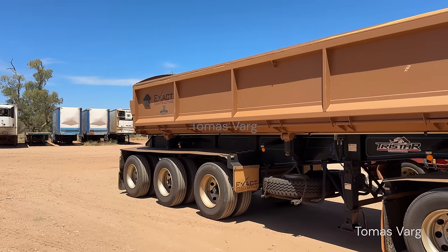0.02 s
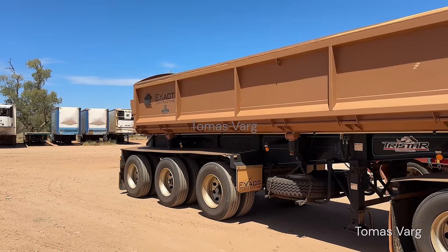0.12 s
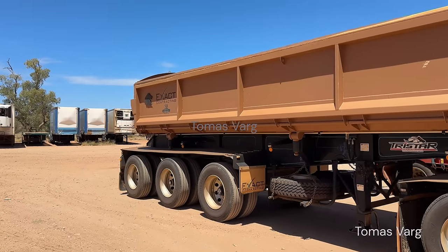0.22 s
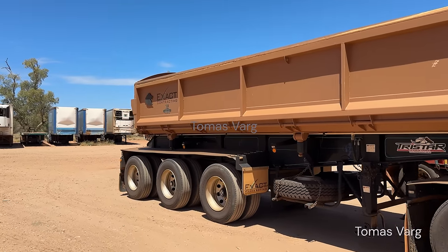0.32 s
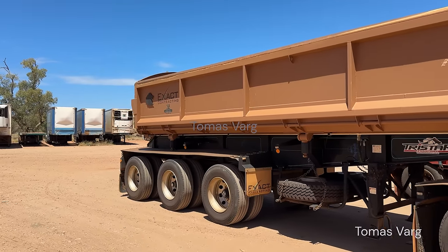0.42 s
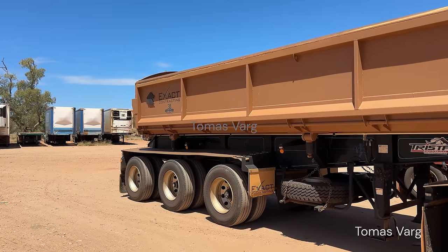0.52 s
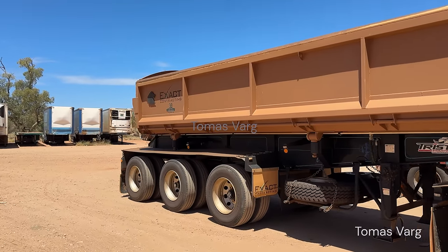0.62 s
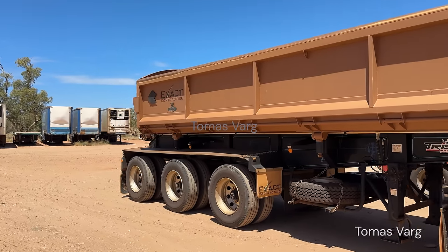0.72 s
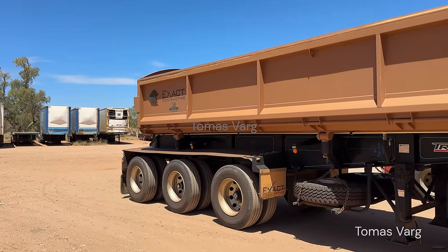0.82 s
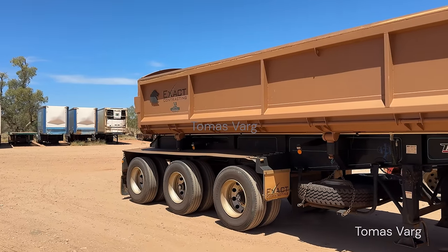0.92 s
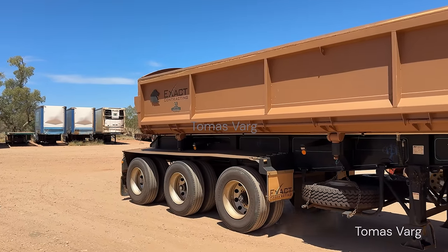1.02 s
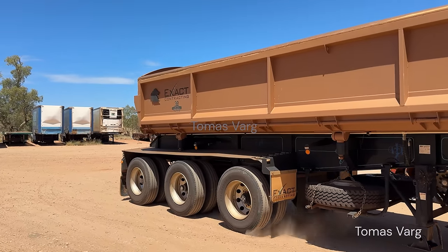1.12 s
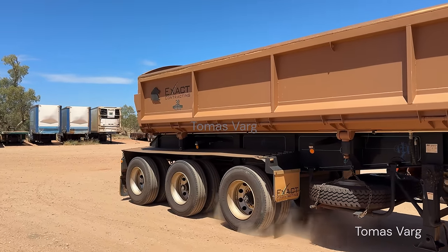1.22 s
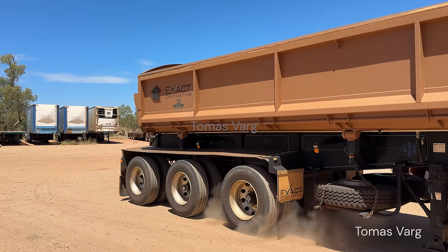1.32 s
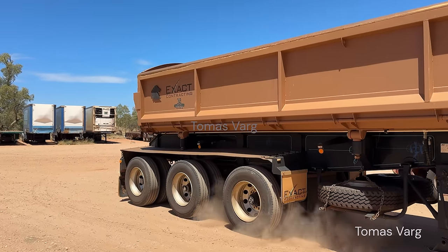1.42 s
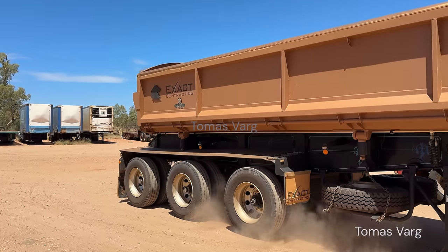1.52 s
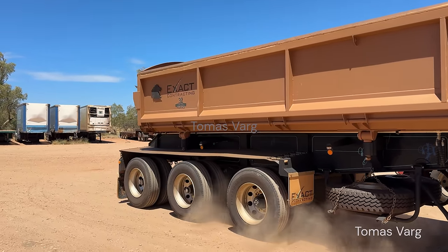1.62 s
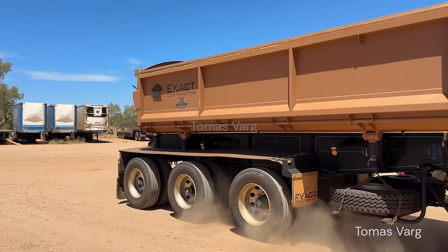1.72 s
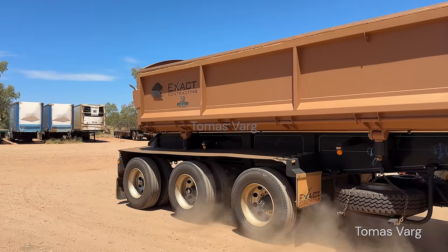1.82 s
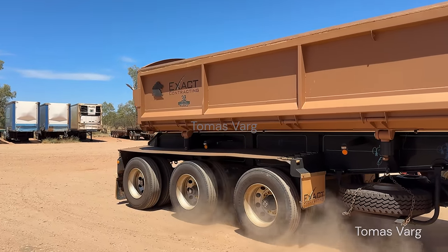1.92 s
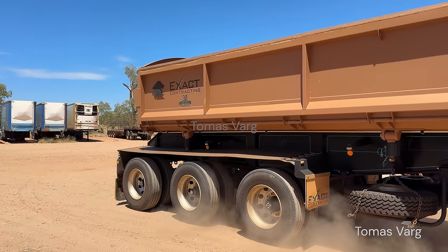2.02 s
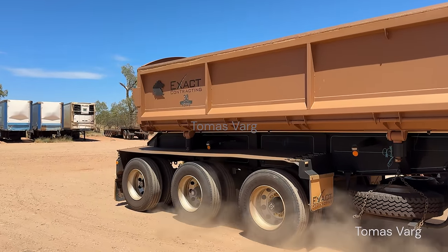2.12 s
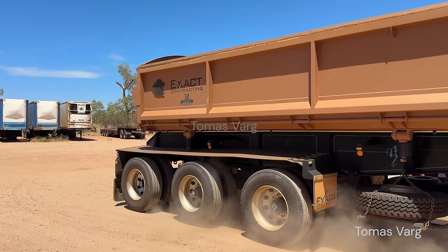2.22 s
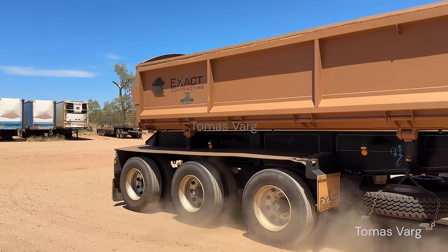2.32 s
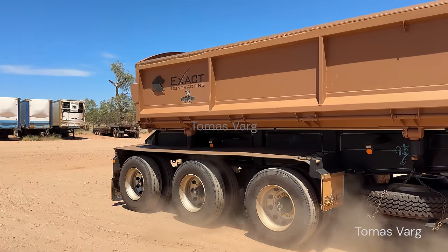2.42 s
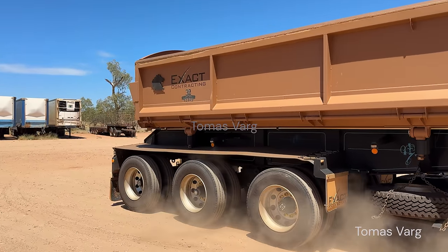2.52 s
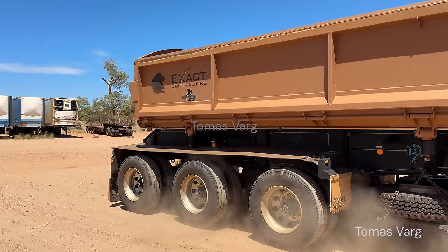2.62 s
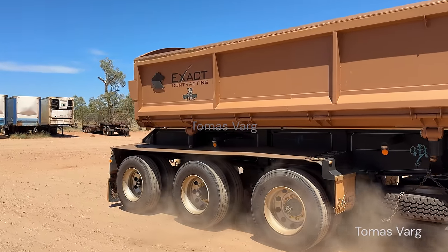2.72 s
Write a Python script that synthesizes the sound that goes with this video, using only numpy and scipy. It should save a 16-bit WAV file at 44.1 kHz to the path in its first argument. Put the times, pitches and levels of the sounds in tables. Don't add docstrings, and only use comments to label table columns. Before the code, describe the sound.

Air brakes of a heavy truck trailer release: faint dull hisses and a low knock, then a sudden loud bright blast that slowly weakens and shuts off, over faint diesel idle in an open yard, stereo.

```python
import sys
import numpy as np
from scipy import signal
from scipy.fft import rfft, irfft, next_fast_len
from scipy.io import wavfile

SR = 44100
rng = np.random.default_rng(int(sys.argv[2]) if len(sys.argv) > 2 else 0)


def gain_from_db(level_db):
    decades = np.asarray(level_db, float) / 20
    return 10 ** decades


def pcm_store(signal):
    levels = np.round(np.clip(np.atleast_2d(signal), -1, 1) * 32767)
    wavfile.write(sys.argv[1], SR, levels.astype(np.int16).T)


N = 121275

# (frequency [Hz], density [dB/Hz])
LEAK_JET_DB = [(150, -5.5), (400, -10.5), (900, -2), (1900, -0.5), (2500, -6), (5800, -5), (8500, -14),
               (16000, -34)]
# (frequency [Hz], density [dB/Hz])
FIRST_JET_DB = [(100, -13), (700, -10.5), (1900, -2), (2700, -8), (3900, -3), (6500, -4.5), (8500, -14),
                (16000, -29)]
# (frequency [Hz], density [dB/Hz])
FAR_JET_DB = [(100, -7), (700, -13.5), (1900, -3.5), (2500, -7), (3800, -5), (6500, -4), (8500, -17),
              (16000, -24.5)]
# (frequency [Hz], density [dB/Hz])
UNDER_JET_DB = [(60, -27), (150, -11), (500, -19), (1300, 0), (2100, -8), (3600, -10), (7500, -10),
                (16000, -19)]
# (frequency [Hz], density [dB/Hz])
BODY_JET_DB = [(60, -15.5), (112, 1), (160, -9.5), (225, -2), (290, -11.5), (600, -3), (1300, -11.5),
               (4000, -32.5)]
# (frequency [Hz], density [dB/Hz])
MIDDLE_JET_DB = [(60, -24), (300, -4), (1000, -11.5), (1800, -1.5), (2800, -4), (4500, -2.5), (7000, -10.5),
                 (16000, -13)]
# (frequency [Hz], density [dB/Hz])
NEAR_JET_DB = [(200, -19.5), (1050, -2), (1750, -8.5), (2800, -6.5), (7200, -4), (8500, 0.5), (11000, -0.5),
               (16000, -3.5)]

# (opens [s], shuts [s], level [dB], sag [dB/s], left lag [ms])
LEAK_VALVES = [
    (-0.12, 0.23, -37.5, 4.5, .27),
]
# (opens [s], shuts [s], level [dB], sag [dB/s], left lag [ms])
FIRST_VALVES = [
    (.162, .69, -29, 9.7, .29),
]
# (opens [s], shuts [s], level [dB], sag [dB/s], left lag [ms])
FAR_VALVES = [
    (.467, .686, -22.5, 3.5, .3),
]
# (opens [s], shuts [s], level [dB], sag [dB/s], left lag [ms])
UNDER_VALVES = [
    (.69, 2.2, -16.5, 8.65, 0.308),
]
# (opens [s], shuts [s], level [dB], sag [dB/s], left lag [ms])
BODY_VALVES = [
    (.69, 2.552, -28.5, 6.6, 0.28),
]
# (opens [s], shuts [s], level [dB], sag [dB/s], left lag [ms])
REAR_VALVES = [
    (.689, 1.215, -22.5, 3, 0.29),
]
# (opens [s], shuts [s], level [dB], sag [dB/s], left lag [ms])
MIDDLE_VALVES = [
    (.858, 1.22, -19, 16, 0),
]
# (opens [s], shuts [s], level [dB], sag [dB/s], left lag [ms])
NEAR_VALVES = [
    (.6872, 2.497, -15, 4.81, 0),
]

# (frequency [Hz], power share [0-1])
FAR_DIRECT = [(100, 0.79), (500, 0.46), (1100, .3), (2200, .8), (4500, 0.48), (7000, 0.5), (8500, .3)]
# (frequency [Hz], power share [0-1])
UNDER_DIRECT = [(100, .98), (500, 0.9), (1750, 1), (2400, 0.41), (4300, 0.66), (6300, 0.24), (7800, 0.98)]
# (frequency [Hz], power share [0-1])
NEAR_DIRECT = [(100, 0.92), (500, 1), (1200, 0.36), (2000, .4), (4200, 0.32), (6800, 0.34), (7800, 0.73)]

# (frequency [Hz], width [Hz], boost [dB])
WHISTLES = [(800, 30, 3), (1115, 110, 3), (2773, 190, 3), (3608, 67, 4.5), (4410, 410, 2.5), (8390, 720, 0)]
# (frequency [Hz], level [dB])
LEFT_TILT_DB = [(100, 1), (900, -1), (2300, -1), (3700, 4), (7000, 2.5), (8300, 0.5), (9200, 0.5)]
# (frequency [Hz], T60 [s])
YARD_T60_S = [(200, 0.4), (1000, 0.4), (4000, 0.31), (12000, 0.067)]
# (time [s], peak [dB], pitch [Hz])
KNOCKS = [
    (0.4746, -14, 78.7),
    (0.507, -19.5, 100),
    (.692, -20, 69.4),
    (0.843, -21, 112),
]
# (time [s], level [dB])
IDLE_DB = [(0, -38.5), (.08, -32.5), (.6, -31), (.75, -38.5), (1.1, -40), (1.6, -50.5), (2.2, -47),
           (2.75, -43)]
# (multiple of crank speed [-], level [dB])
ENGINE_ORDERS = [(4, -20), (5, -16), (6, 0), (8, -10), (10, -13), (12, -13)]
# (frequency [Hz], density [dB/Hz])
RUMBLE_JET_DB = [(40, -6.5), (65, -3), (120, -5.5), (250, -18), (1500, -37), (6000, -45), (10000, -59.5),
                 (16000, -86.5)]

CRANK_HZ, WOBBLE_HZ, THROB_DB, RUMBLE_DB = 10.05, 0.11, 1.8, -8
KNOCK_T60_S = 0.074
SPURT_DB, SPURT_S = 2, 0.022
SAG_GROWTH_DB_PER_S2, SHUT_DB_PER_S = 1, 517.5
FAR_OPEN_S, NEAR_OPEN_S = 0.012, 0.0007
YARD_DB, YARD_GAP_S, YARD_ALIKE = -12, 0.015, 0.81
PORT_TURN_HZ, JOINT_HZ = 7500, 8900
JOINT_LAG_MS, JOINT_IN_STEP_HZ = 0.35, 11047
LOW_CUT_HZ, TOP_CUT_HZ = 51, 15780
DRIFT_STEP = 40

SIZE = next_fast_len(N + SR)
HZ = np.maximum(np.arange(SIZE // 2 + 1) * SR / SIZE, 1)
TIME = np.arange(N) / SR


def at_hz(points, hz):
    table_hz, value = np.transpose(points)
    return np.interp(np.log(hz), np.log(table_hz), value)


def rms_one(x):
    return x / np.sqrt(np.mean(x ** 2) + 1e-20)


def drift(rate_hz, count):
    pole = np.exp(-2 * np.pi * rate_hz * DRIFT_STEP / SR)
    noise = rng.standard_normal((count, N // DRIFT_STEP + 2002))
    slow = signal.lfilter([1], [1, -2 * pole, pole ** 2], noise)[:, 2000:]
    place = np.arange(N) / DRIFT_STEP
    return np.array([np.interp(place, np.arange(len(row)), rms_one(row)) for row in slow])


def bands(x, count):
    spectrum = rfft(x, SIZE)
    place = np.clip(np.log(HZ / 150) / np.log(100) * (count - 1), 0, count - 1)
    for k in range(count):
        weight = np.clip(1 - abs(place - k), 0, 1)
        yield 150 * 100 ** (k / (count - 1)), irfft(spectrum * weight, SIZE)[:, :x.shape[1]]


def treble_lag():
    return np.exp(-2j * np.pi * (HZ - JOINT_IN_STEP_HZ) * JOINT_LAG_MS / 1000)


def at_ports(colour_db, direct, lag_ms):
    common, left, right = rfft(rng.standard_normal((3, SIZE)))
    share = np.clip(at_hz(direct, HZ), 0, 1)
    plain_lag = np.exp(-2j * np.pi * HZ * lag_ms / 1000)
    late = np.where(HZ < PORT_TURN_HZ, plain_lag, treble_lag())
    direct_part = np.sqrt(share) * np.array([common * late, common])
    scattered_part = np.sqrt(1 - share) * np.array([left, right])
    return rms_one(irfft((direct_part + scattered_part) * gain_from_db(colour_db), SIZE)[:, :N])


def diesel():
    crank_rad = 2 * np.pi * np.cumsum(CRANK_HZ + WOBBLE_HZ * drift(2.6, count=1)[0]) / SR
    throb = drift(9.5, count=len(ENGINE_ORDERS))
    start_rad = rng.uniform(0, 2 * np.pi, len(ENGINE_ORDERS))
    tones = np.zeros(N)
    for k, (order, db) in enumerate(ENGINE_ORDERS):
        tones += gain_from_db(db + THROB_DB * throb[k]) * np.sin(round(order) * crank_rad + start_rad[k])
    rumble = gain_from_db(RUMBLE_DB) * at_ports(at_hz(RUMBLE_JET_DB, HZ), UNDER_DIRECT, lag_ms=0.086)
    level = gain_from_db(np.interp(TIME, *np.transpose(IDLE_DB)))
    return level * (rms_one(tones) + rumble)


def knocks():
    out = np.zeros(N)
    for time_s, peak_db, hz in KNOCKS:
        since_s = np.maximum(TIME - time_s, 0)
        out += gain_from_db(peak_db - 60 * since_s / KNOCK_T60_S) * np.sin(2 * np.pi * hz * since_s)
    return out


def yard(x):
    time_s = TIME[:SR // 2 * 2]
    shared, *own = rng.standard_normal((3, len(time_s)))
    noise = np.sqrt(YARD_ALIKE) * shared + np.sqrt(1 - YARD_ALIKE) * np.array(own)
    tail = sum(band * gain_from_db(-60 * time_s / at_hz(YARD_T60_S, hz)) for hz, band in bands(noise, count=6))
    tail = tail * (time_s > YARD_GAP_S) / np.sqrt(np.sum(tail ** 2) / 2)
    return gain_from_db(YARD_DB) * signal.fftconvolve(x, tail, axes=1)[:, :N]


def flutter(x, slow_db, own_db):
    shared = drift(5, count=1)[0]
    own = drift(12.3, count=12)
    out = 0
    for k, (_, band) in enumerate(bands(x, count=12)):
        out = out + band * gain_from_db(slow_db * shared + own_db * own[k])
    return out


def valves(table, colour, direct, open_s):
    colour_db = at_hz(colour, HZ)
    for hz, width_hz, boost_db in WHISTLES:
        colour_db = colour_db + boost_db / (1 + (2 * (HZ - hz) / width_hz) ** 2)
    out = 0
    for opens_s, shuts_s, level_db, sag_db_per_s, lag_ms in table:
        since_s = np.maximum(TIME - opens_s, 0)
        db = level_db - sag_db_per_s * since_s - SAG_GROWTH_DB_PER_S2 * since_s ** 2
        db = db + SPURT_DB * np.exp(-since_s / SPURT_S)
        db = db - SHUT_DB_PER_S * np.maximum(TIME - shuts_s, 0)
        opening = 1 - np.exp(-since_s / open_s)
        out = out + opening * gain_from_db(db) * at_ports(colour_db, direct, lag_ms)
    return out


def air_jets():
    air = valves(LEAK_VALVES, LEAK_JET_DB, FAR_DIRECT, FAR_OPEN_S)
    air = air + valves(FIRST_VALVES, FIRST_JET_DB, FAR_DIRECT, FAR_OPEN_S)
    air = air + valves(FAR_VALVES, FAR_JET_DB, FAR_DIRECT, FAR_OPEN_S)
    air = air + valves(REAR_VALVES, MIDDLE_JET_DB, UNDER_DIRECT, NEAR_OPEN_S)
    air = air + valves(UNDER_VALVES, UNDER_JET_DB, UNDER_DIRECT, NEAR_OPEN_S)
    air = air + valves(BODY_VALVES, BODY_JET_DB, UNDER_DIRECT, NEAR_OPEN_S)
    air = air + valves(MIDDLE_VALVES, MIDDLE_JET_DB, NEAR_DIRECT, NEAR_OPEN_S)
    air = air + valves(NEAR_VALVES, NEAR_JET_DB, NEAR_DIRECT, NEAR_OPEN_S)
    return flutter(air, slow_db=-0.18, own_db=0.94)


def scene():
    air = air_jets()
    return diesel() + knocks() + yard(air) + air


def low_pass(x):
    return signal.sosfilt(signal.butter(12, 16180, fs=SR, output="sos"), x)


def record(dry):
    left, right = rfft(dry, SIZE)
    high = 1 / (1 + (JOINT_HZ / HZ) ** 30)
    left = (1 - high) * left + high * treble_lag() * right
    tilt = gain_from_db(at_hz(LEFT_TILT_DB, HZ) / 2)
    x = irfft(np.array([left * tilt, right / tilt]), SIZE)[:, :N]
    x = 1.574 * np.tanh(x / 1.423)
    x = signal.sosfilt(signal.butter(3, LOW_CUT_HZ, "high", fs=SR, output="sos"), x)
    x = signal.sosfilt(signal.ellip(12, 0.5, 90, TOP_CUT_HZ, fs=SR, output="sos"), x)
    return low_pass(x)


dry = scene()
out = record(dry)
pcm_store(out)
```